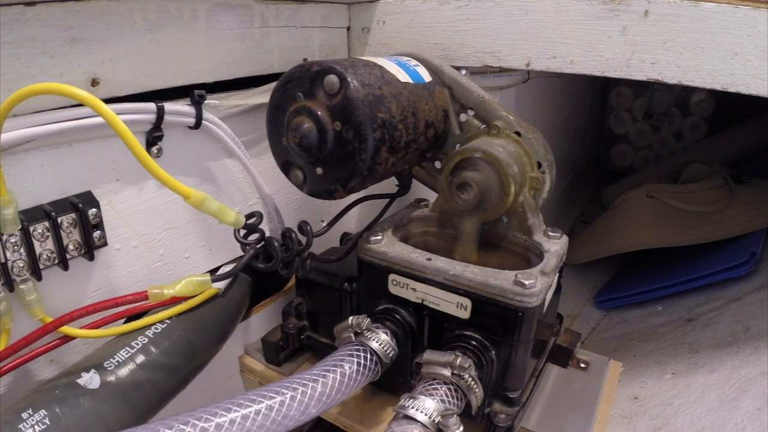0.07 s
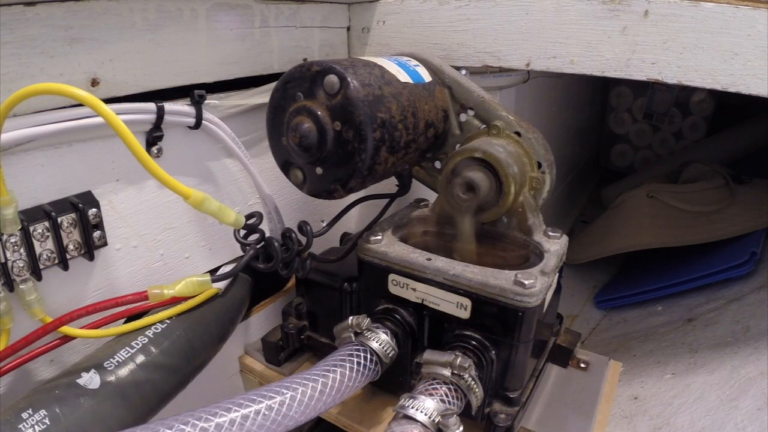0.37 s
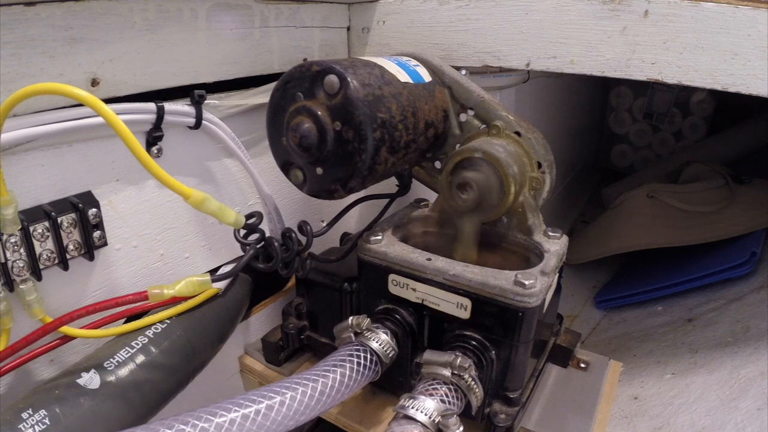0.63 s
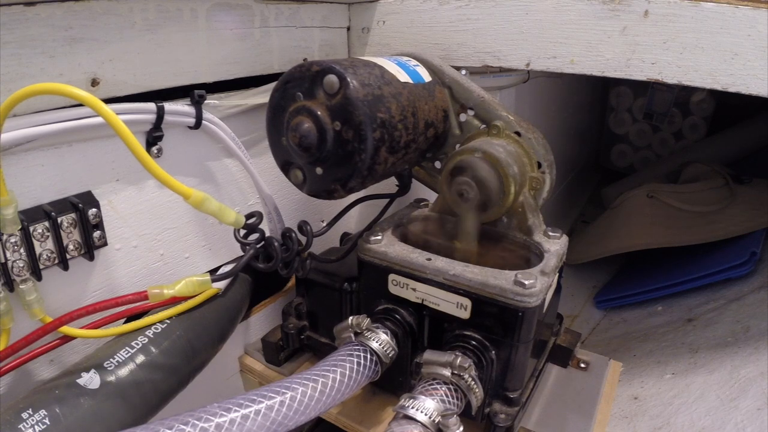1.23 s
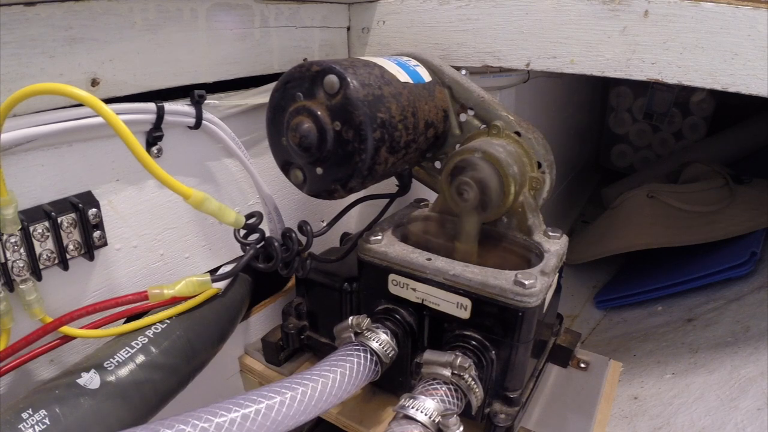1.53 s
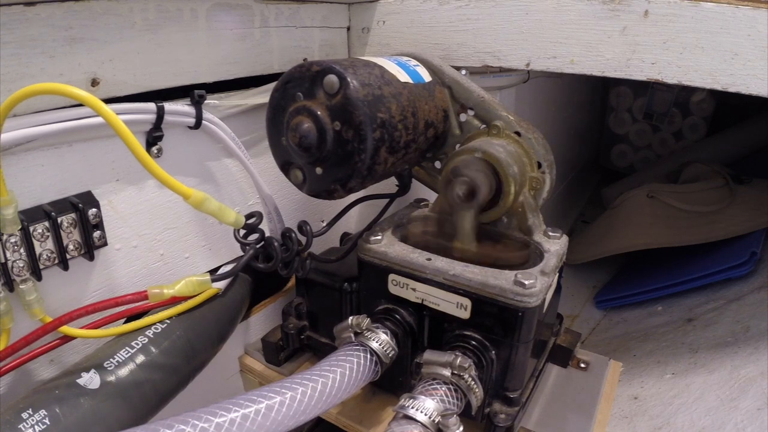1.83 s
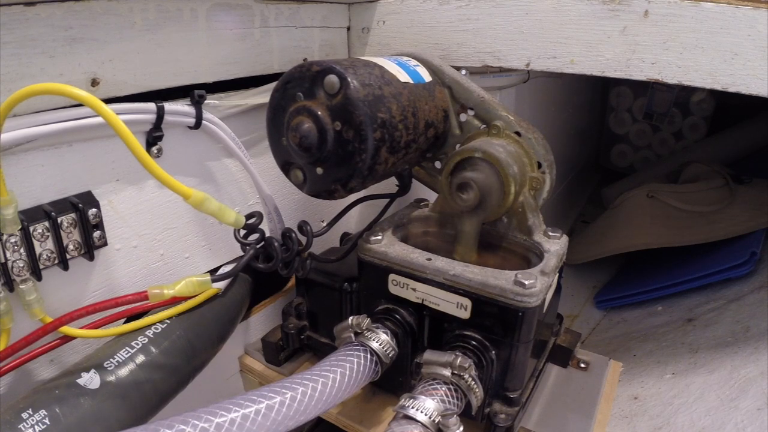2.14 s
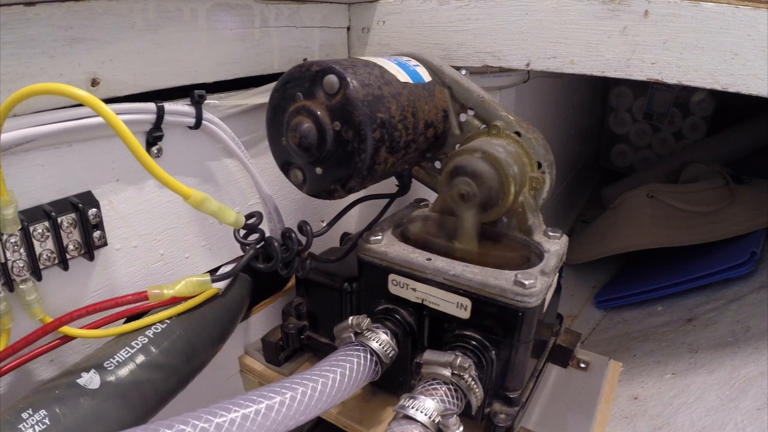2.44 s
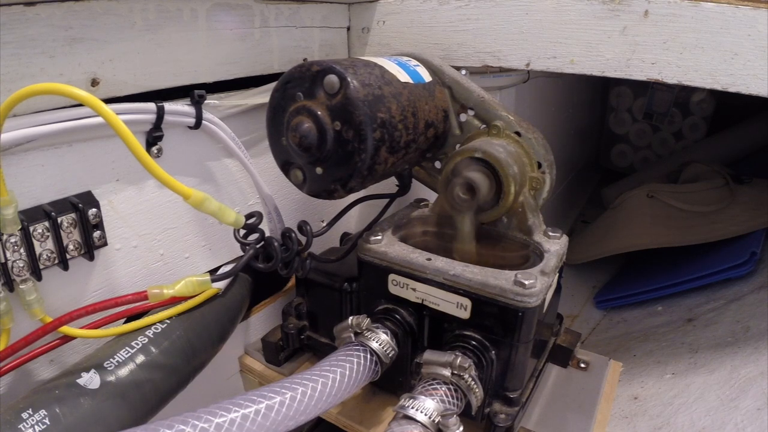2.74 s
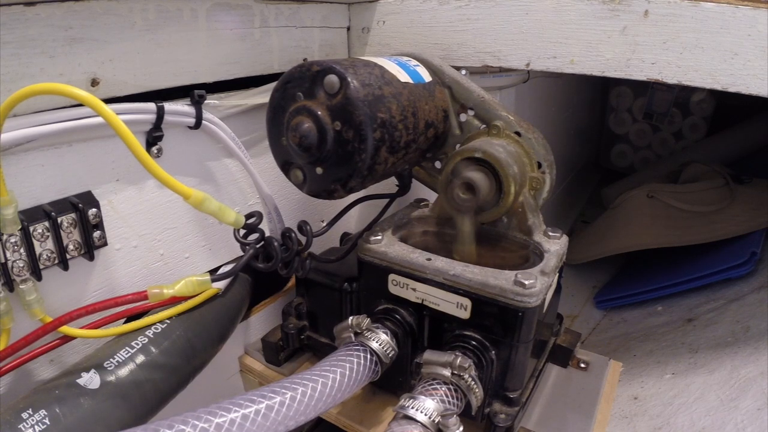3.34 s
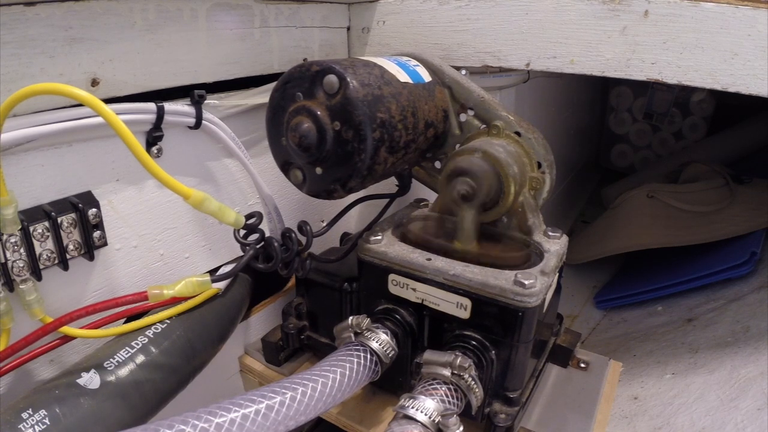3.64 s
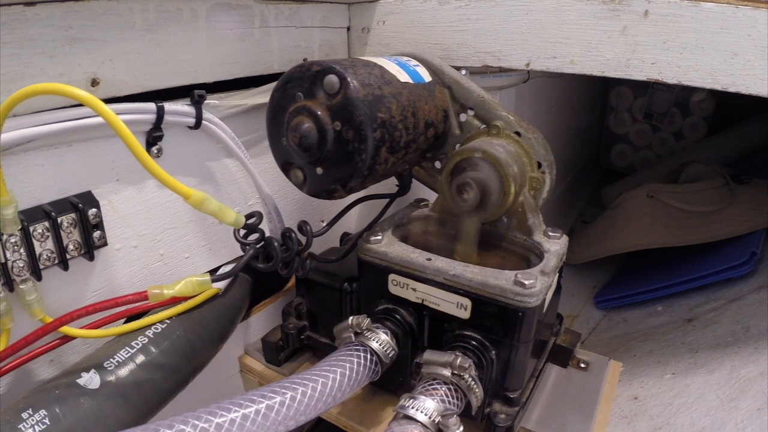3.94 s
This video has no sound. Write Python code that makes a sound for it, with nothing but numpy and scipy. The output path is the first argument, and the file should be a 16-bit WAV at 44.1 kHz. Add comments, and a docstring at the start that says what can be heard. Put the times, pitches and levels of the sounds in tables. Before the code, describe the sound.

Heard up close in a cramped boat compartment, an electric diaphragm pump whirs and whines. Its pitch then sags as rapid knocks, gritty spurts and clacking valves come in, followed by dull plumbing thuds and a growing low hum.

```python
"""A wavering whine over a rapid, rasping beat: a belt-driven diaphragm pump runs in a small wooden boat
compartment and slows as it takes up load. The whine is the meshing of the toothed belt, modulated by
every stroke. Each stroke also knocks the chamber, rasps through the valves and shakes the mount.
Valve flaps clack, the belt growls while slack, the motor whirs and rings, the hose hums as pressure
builds, and a few dull thuds come from the plumbing."""
import sys
import numpy as np
from scipy import signal
from scipy.fft import rfft, irfft
from scipy.io import wavfile
from scipy.ndimage import uniform_filter1d, map_coordinates

SR = 44100
rng = np.random.default_rng(int(sys.argv[2]) if len(sys.argv) > 2 else 0)


def wav_out(sig):
    """Save sig, one row per channel (or a flat mono array), as 16-bit PCM at SR to the path in sys.argv[1]."""
    wavfile.write(sys.argv[1], SR, np.round(np.clip(np.atleast_2d(sig).T, -1, 1) * 32767).astype(np.int16))


N = 176400

BELT_TEETH, PINION_TEETH = 37, 11  # teeth meshed per crank turn, per motor turn
# crank speed, one stroke to a turn (time [s], rate [strokes/s])
STROKE_RATE = [(0.0, 17.019), (0.25, 17.511), (0.7, 17.851), (1.3, 18.104), (1.7, 15.511), (2.25, 15.093),
               (2.65, 15.753), (3.1, 14.865), (3.55, 14.512), (4.0, 14.546)]
# envelope of the valves' rasp and ticks (time [s], level [dB])
VALVE_LEVEL = [(0, -38), (.8, -42.5), (1.15, -38.5), (1.3, -32), (1.42, -32.5), (1.5, -27), (1.85, -29),
               (2.2, -26), (2.42, -30), (2.52, -32.5), (2.72, -30.5), (2.82, -30.5), (2.98, -33),
               (3.1, -31.5), (3.45, -32.5), (3.65, -32.5), (4, -33)]


def belt(turn):
    """Frequency modulation: the tooth-mesh tone swings with each stroke, sweeping the frame's modes."""
    # excitation by the teeth (time [s], mesh tone level [dB], octave level [dB])
    mesh_levels = [(0, -20, -18), (.4, -19.5, -22.5), (.85, -26, -23), (1.15, -28, -26.5),
                   (1.45, -25.5, -22), (1.7, -25.5, -23), (2.25, -25, -22), (2.7, -27.5, -22.5),
                   (3.2, -26.5, -23.5), (3.6, -32, -22.5), (4, -24, -19.5)]
    # resonances of the pump frame (frequency [Hz], bandwidth [Hz], gain [dB])
    frame_modes = [(482, 42, -4), (526.3, 61, -0.5), (586, 27, -3.5), (699, 78, -3), (1087, 47, -1),
                   (1177.4, 35, -2), (1272, 22, -1.5), (1334, 64, -4.5)]
    light_ripple, loaded_ripple, jitter = .03, .048, .003  # fractions of the speed
    fastest_turn, slap_db = .17, -25
    speed = curve(STROKE_RATE)
    load = (speed.max() - speed) / np.ptp(speed)
    ripple = light_ripple + load * (loaded_ripple - light_ripple)
    sway = ripple * np.sin(2 * np.pi * (turn - fastest_turn)) / (2 * np.pi)
    flutter = np.cumsum(jitter * walk(27.2) * speed) / SR
    tooth = BELT_TEETH * (turn + sway + flutter)
    runout = 1 + .2 * np.cos(2 * np.pi * tooth / PINION_TEETH)  # once per pinion turn
    tooth_slap = unit(resonate(noise(), hz=860, width=250))
    drive = undb(slap_db + curve(mesh_levels, column=2)) * tooth_slap
    for k, depth_db, peak_turn in [(1, 4.8, .2), (2, 1.2, .08)]:  # mesh tone, then its octave
        wear = .22 * np.sqrt(k) * unit(sum(harmonic(turn, order) for order in range(3, 8)))
        roughness = .085 * (walk(160) + 1j * walk(160))
        tone = np.real(np.exp(2j * np.pi * k * tooth) * (runout + wear + roughness))
        drive += unit(tone) * swing(turn, depth_db, peak_turn) * undb(curve(mesh_levels, column=k))
    frame = sum(undb(db) * resonate(drive, hz, width) for hz, width, db in frame_modes)
    overtones = np.cos(2 * np.pi * 5 * tooth) + np.cos(2 * np.pi * 6 * tooth) / 2
    return frame + undb(-34.5) * resonate(overtones, hz=3280, width=110)


def chamber(turn):
    """Impulse response: the diaphragm's push and softer return each ring the chamber's modes."""
    # envelope of the knocking (time [s], relative level [dB])
    knock_level = [(0, -39.5), (1.5, -41), (1.7, -28), (2.25, -28), (2.55, -31.5), (2.8, -29), (3.05, -26),
                   (3.5, -24), (4, -26)]
    # modes of the chamber (frequency [Hz], relative level [dB], T60 [s])
    chamber_modes = [(111.6, -9, 0.1), (166.4, 0.5, 0.21), (189.6, -0.5, 0.13), (218.5, -7.5, 0.11),
                     (311, -4, 0.031), (474, -4.5, 0.079)]
    ring = modes(chamber_modes)
    onset = 1 - np.exp(-np.arange(len(ring)) / SR / .002)  # 2 ms rise
    pushes = strokes(turn, at=.85, scatter_db=1.5)
    returns = undb(-11) * strokes(turn, at=.3, scatter_db=1.5)
    knocks = signal.fftconvolve(pushes + returns, ring * onset)[:N]
    return unit(knocks) * undb(curve(knock_level) + .5)


def valve_rasp(turn):
    """Flow noise: every stroke forces a short, gritty spurt through the valves."""
    # spectrum of the spurts (frequency [Hz], relative level [dB])
    rasp_spectrum = [(300, -9), (800, 4), (1200, 3.5), (1700, 5.5), (2600, -2), (3700, -7.5), (5300, -9.5),
                     (8000, -21.5), (11000, -33), (15000, -55)]
    rise_s, fall_s, lead_s = .0043, .019, .0032
    t = np.arange(-SR // 10, SR // 10) / SR + lead_s
    shape = np.exp(np.where(t < 0, t / rise_s, -t / fall_s))
    spurts = signal.fftconvolve(strokes(turn, at=0, scatter_db=1.4), shape, "same")
    grit = noise() * undb(2.3 * walk(690))
    return colour(grit * spurts, rasp_spectrum) * undb(curve(VALVE_LEVEL))


def valve_clacks(turn):
    """Impact sound: rubber flaps tick each stroke or slap and ring the housing; loose parts rattle."""
    # flaps slapping shut (time [s], crack level [dB], ring level [dB])
    closures = [(.908, -36, -15), (.963, -33, -15), (1.129, -33, -15.5), (1.24, -19, -20),
                (1.271, -25, -28), (1.294, -29, -22), (1.352, -21.5, -20), (1.465, -26, -17),
                (1.523, -24, -19), (1.585, -23, -15.5), (1.649, -24, -18), (1.774, -28, -12.5),
                (1.839, -22, -13), (1.909, -25, -21), (2.039, -26, -19), (2.105, -19.5, -17),
                (2.167, -24, -28), (2.366, -27, -16), (2.428, -21, -17.5), (2.815, -22, -15.5),
                (2.882, -24, -20), (3.083, -19, -18), (3.219, -27, -26), (3.347, -21.5, -32),
                (3.621, -23, -20), (3.688, -21, -23), (3.832, -23, -27)]
    # spectrum of the impacts before the low-pass (frequency [Hz], relative level [dB])
    crack_spectrum = [(200, -12), (900, -1), (1500, 1), (2700, -2.5), (4000, -7), (6000, -9), (9000, -15),
                      (15000, -28)]
    # modes of the valve housing (frequency [Hz], relative level [dB], T60 [s])
    housing_modes = [(1160, -9, .025), (1345, -0.5, 0.028), (1730, -2.5, 0.02), (2480, -5, 0.016)]
    slap_decay_s, tick_decay_s, rattles_per_s, cutoff_hz = .003, .0028, 58, 6200
    t = np.arange(N) / SR
    slaps, blows = np.zeros(N), np.zeros(N)
    for start, crack_db, ring_db in closures:
        slaps += undb(crack_db) * (t >= start) * np.exp(-np.abs(t - start) / slap_decay_s)
        blows[int(start * SR)] = undb(ring_db)
    ticks = strokes(turn, at=0, scatter_db=1) * undb(curve(VALVE_LEVEL) - 7)
    rattle = (rng.random(N) < rattles_per_s / SR) * undb(-34.5 + 1.5 * noise())
    taps = signal.lfilter([1], [1, -np.exp(-1 / (tick_decay_s * SR))], ticks + rattle)
    bursts = (slaps + taps) * colour(noise(), crack_spectrum)
    cracks = signal.lfilter(*signal.butter(2, cutoff_hz, fs=SR), bursts)
    return cracks + signal.fftconvolve(blows, modes(housing_modes))[:N]


def motor(turn):
    """Friction noise: brushes and bearings whir, partly alike on every turn, and the casing resonates."""
    # spectrum of the whir (frequency [Hz], relative level [dB])
    whir_spectrum = [(30, -1), (100, 9), (150, 2), (210, 2), (290, 0), (385, 3.5), (650, -6), (880, -4),
                     (1200, 3.5), (1600, -11.5), (2200, -13), (3000, -13.5), (4000, -18.5), (5500, -22),
                     (7600, -23), (10500, -29.5), (15000, -39)]
    # resonances of the casing (frequency [Hz], nominal bandwidth [Hz], level [dB])
    casing_modes = [(549, 47, -33.5), (1073.5, 62, -31.5), (1695, 250, -38.5), (2030, 45, -48.5),
                    (3274, 66, -41)]
    whir_db, periodic_share = -28, .29
    one_turn = rng.standard_normal(SR // 16)
    periodic = unit(map_coordinates(one_turn, [turn % 1 * len(one_turn)], mode="wrap"))
    rub = np.sqrt(periodic_share) * periodic + np.sqrt(1 - periodic_share) * noise()
    whir = colour(rub * undb(1.66 * walk(170)), whir_spectrum) * undb(whir_db)
    rings = sum(undb(db) * unit(noise_band(hz, 2.3 * width)) for hz, width, db in casing_modes)
    return whir * swing(turn, depth_db=-.5, at=.44) + rings * swing(turn, depth_db=.39, at=.14)


def mount(turn):
    """Forced vibration: the crank and the unbalanced rotor shake the board under the pump."""
    # envelope of the shaking (time [s], relative level [dB])
    shake_level = [(0, -30.5), (.6, -31.5), (1, -32.5), (1.3, -28.5), (1.55, -31.5), (1.75, -40),
                   (2.3, -35), (2.6, -35), (3, -34), (4, -43)]
    # harmonics of the crank (order [multiple of the stroke rate], relative level [dB])
    crank_orders = [(1, -1), (2, -1), (3, 8.5), (4, 3), (11, -3.5), (18, -2.5), (20, -3)]
    crank = sum(undb(db) * harmonic(turn, order) for order, db in crank_orders)
    rotor = undb(-15) * np.cos(2 * np.pi * turn * BELT_TEETH / PINION_TEETH)
    return unit(crank + rotor) * undb(curve(shake_level) + 1)


def slack_belt(turn):
    """Transverse vibration: the belt flaps with a rough growl, most before the load pulls it tight."""
    # envelope of the flapping (time [s], level [dB])
    flap_level = [(0, -33.5), (.6, -30.5), (1.1, -27), (1.4, -31), (1.7, -44.5), (4, -45)]
    growl = unit(noise_band(hz=582, width=230))
    return growl * swing(turn, depth_db=.88, at=.27) * undb(curve(flap_level))


def hose(turn):
    """Periodic forcing: as pressure builds, the hose hums on harmonics of the stroke rate."""
    # envelope of the hum (time [s], level [dB])
    hum_level = [(0, -51), (1.7, -41.5), (2.9, -43), (3.3, -35), (3.65, -28.5), (4, -28)]
    # harmonics of the hum (order [multiple of the stroke rate], relative level [dB])
    hum_orders = [(6, -6), (8, -2), (10, -3), (16, -9.5)]
    hum = sum(undb(db) * np.cos(2 * np.pi * (order * turn + rng.random()) + .52 * walk(8))
              for order, db in hum_orders)
    return unit(hum) * undb(curve(hum_level))


def plumbing():
    """Damped resonance: dull thuds and gulps in the pipes swell and die away exponentially."""
    # thuds (time [s], level [dB], centre [Hz], bandwidth per stage [Hz], rise [s], decay [s])
    thuds = [(2.344, -10.5, 250, 260, .001, .014), (2.358, -15.5, 340, 330, .006, .04),
             (2.365, -14.5, 45, 40, .008, .03), (2.452, -16, 398, 447, .001, .011),
             (2.468, -9.5, 97, 25, .04, .034), (3.09, -9.5, 290, 220, .03, .046),
             (3.108, -20, 480, 740, .006, .04)]
    out = np.zeros(N)
    for start, db, hz, width, rise, decay in thuds:
        age = np.maximum(np.arange(N) / SR - start, 0)
        body = noise_band(hz, width)
        body /= np.sqrt(uniform_filter1d(body ** 2, size=SR // 40) + 1e-12)  # level held over 25 ms
        out += undb(db) * body * (1 - np.exp(-age / rise)) * np.exp(-age / decay)
    return out


def compartment(x):
    """Reverberation: close wooden walls return dense, quickly decaying reflections."""
    t60_s, first_echo_s, wet = .065, .002, undb(-11)
    t = np.arange(SR // 3) / SR
    response = rng.standard_normal(len(t)) * np.exp(-np.log(1000) * t / t60_s) * (t > first_echo_s)
    echoes = signal.fftconvolve(x, response / np.linalg.norm(response))[:N]
    return (x + wet * echoes) / np.hypot(1, wet)


def undb(db):
    """Amplitude ratio of a level in decibels."""
    return 10 ** (np.asarray(db) / 20)


def unit(x):
    """Normalisation to rms 1."""
    return x / np.sqrt(np.mean(x ** 2))


def curve(rows, column=1):
    """Linear interpolation of a table column over time."""
    rows = np.array(rows)
    return np.interp(np.arange(N) / SR, rows[:, 0], rows[:, column])


def noise():
    """White Gaussian noise."""
    return rng.standard_normal(N)


def colour(x, points):
    """Spectral shaping by (frequency [Hz], level [dB]) points, to rms 1."""
    hz, db = np.array(points).T
    f = np.maximum(np.fft.rfftfreq(N, 1 / SR), 1)
    gain = undb(np.interp(np.log(f), np.log(hz), db))
    return unit(irfft(rfft(x) * gain, N))


def resonate(x, hz, width):
    """Two-pole resonance with a bandwidth in Hz."""
    return signal.lfilter(*signal.iirpeak(hz, hz / width, fs=SR), x)


def noise_band(hz, width):
    """Band-pass noise from two equal resonant stages in series."""
    return resonate(resonate(noise(), hz, width), hz, width)


def modes(rows):
    """Free decay after one blow, from (frequency [Hz], level [dB], T60 [s]) rows."""
    t = np.arange(SR // 2) / SR
    return sum(undb(db) * np.exp(-np.log(1000) * t / t60) * np.sin(2 * np.pi * hz * t)
               for hz, db, t60 in rows)


def walk(hz):
    """Smooth random fluctuation: noise low-passed at hz, to rms 1."""
    f = np.fft.rfftfreq(N, 1 / SR)
    return unit(irfft(rfft(noise()) / (1 + (f / hz) ** 4), N))


def harmonic(turn, order):
    """Sinusoid at a multiple of the stroke rate, with a random starting phase."""
    return np.cos(2 * np.pi * (order * turn + rng.random()))


def swing(turn, depth_db, at):
    """Amplitude modulation once a stroke, peaking at the given turn (dipping if the depth is negative)."""
    return unit(undb(depth_db * np.cos(2 * np.pi * (turn - at))))


def strokes(turn, at, scatter_db):
    """Impulse train: one uneven pulse each time the crank passes a given fraction of a turn."""
    crossings = np.flatnonzero(np.diff(np.floor(turn - at)) > 0)
    out = np.zeros(N)
    out[crossings] = undb(scatter_db * noise()[:len(crossings)])
    return out


def scene():
    """Superposition: one crank angle, counted in turns, keeps the parts of the pump in step."""
    turn = np.cumsum(curve(STROKE_RATE)) / SR - .005
    clatter = compartment(valve_rasp(turn) + valve_clacks(turn) + motor(turn))
    pump = belt(turn) + slack_belt(turn) + clatter + mount(turn) + chamber(turn)
    return (pump + hose(turn) + plumbing())[None]


def record(dry):
    """Band limiting: filters thin the deepest bass and cut the highest treble."""
    low_hz, top_hz = 25.8, 15250
    thinned = signal.sosfilt(signal.butter(2, low_hz, "high", fs=SR, output="sos"), dry)
    return signal.sosfilt(signal.ellip(10, .2, 80, top_hz, fs=SR, output="sos"), thinned)


dry = scene()
out = record(dry)
wav_out(out)
```